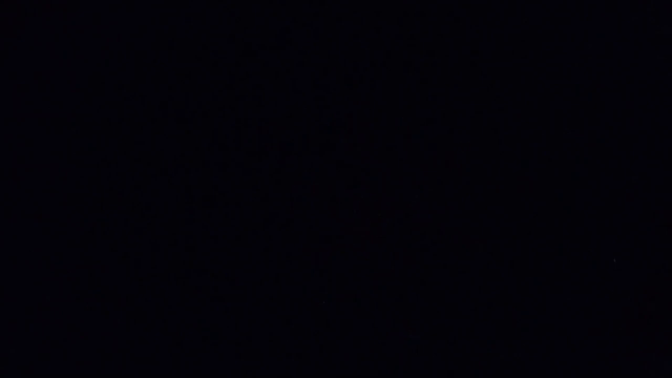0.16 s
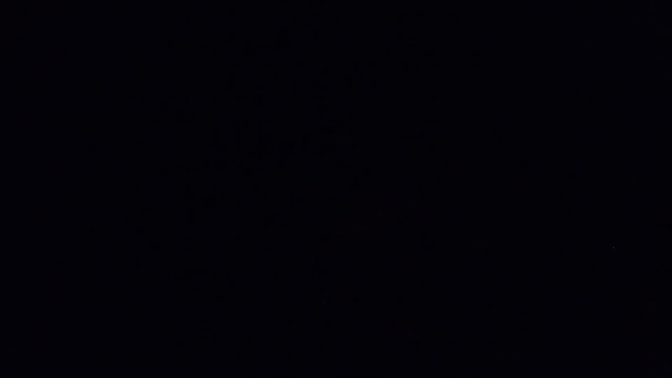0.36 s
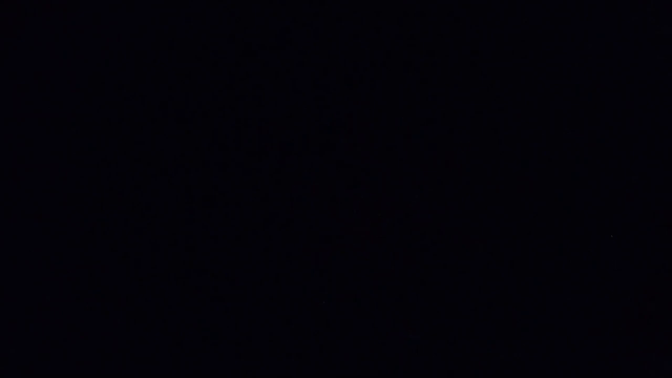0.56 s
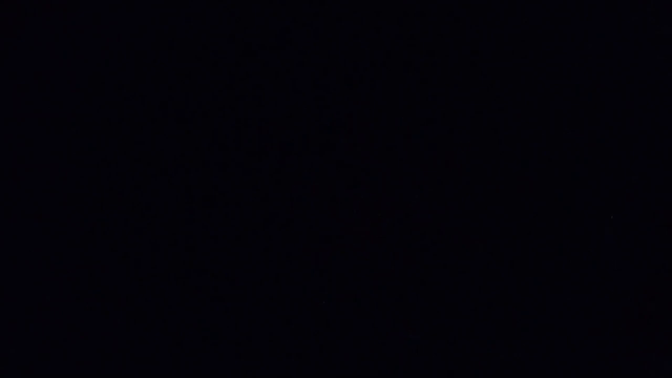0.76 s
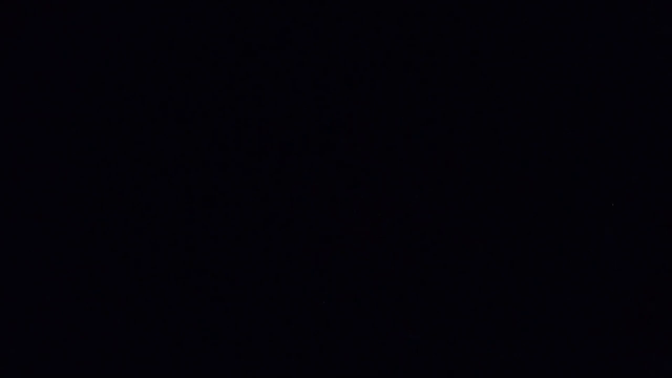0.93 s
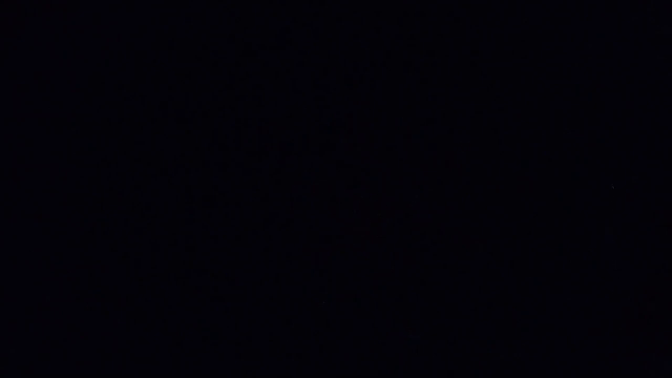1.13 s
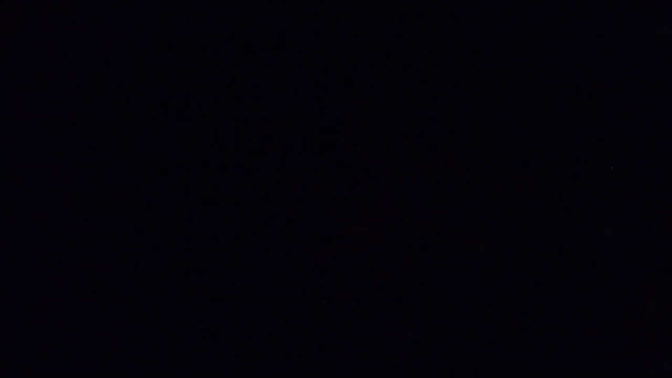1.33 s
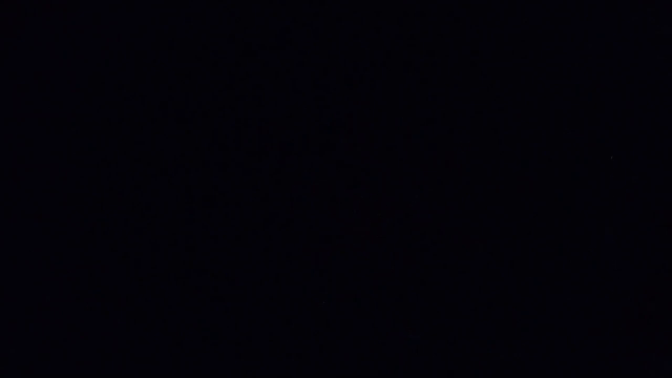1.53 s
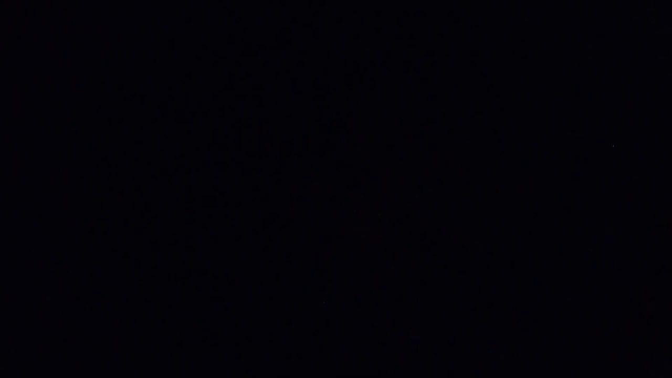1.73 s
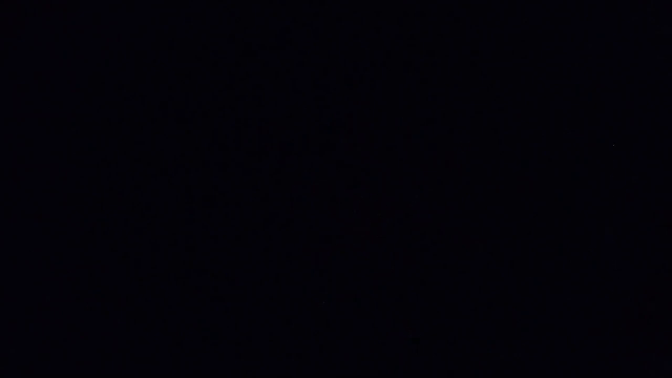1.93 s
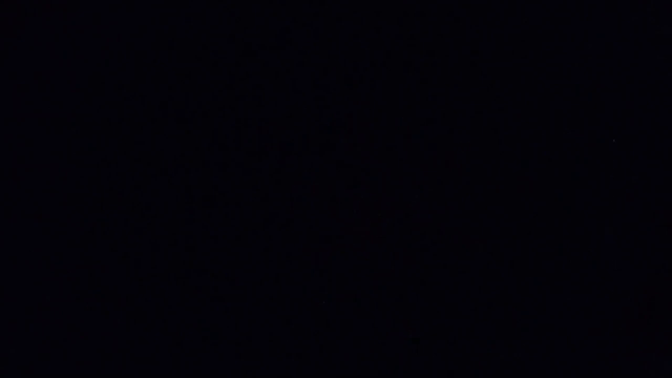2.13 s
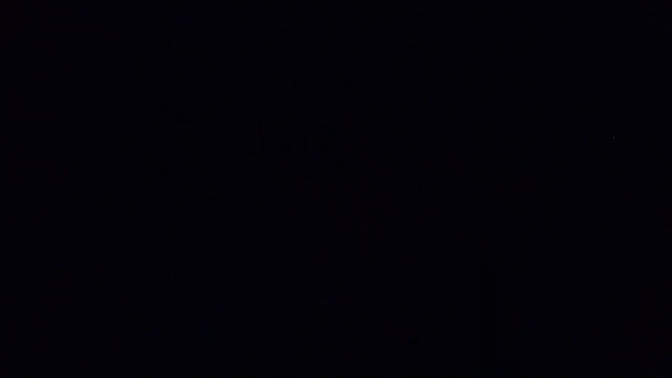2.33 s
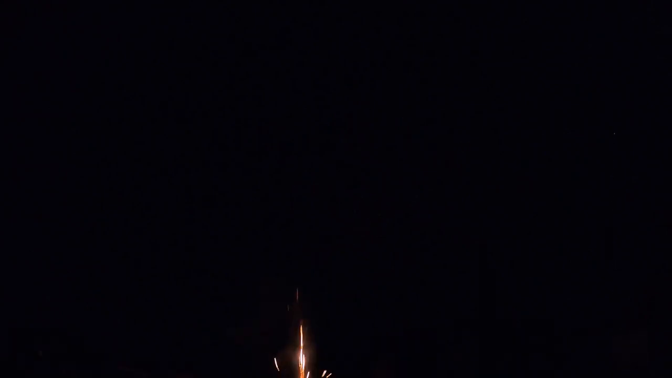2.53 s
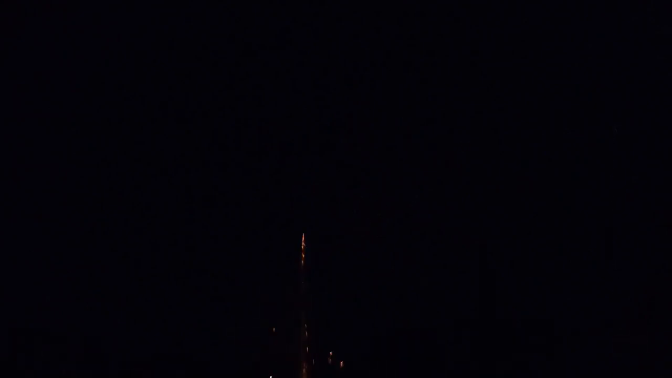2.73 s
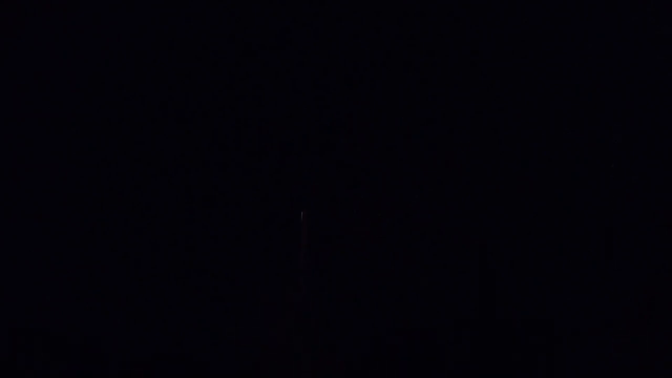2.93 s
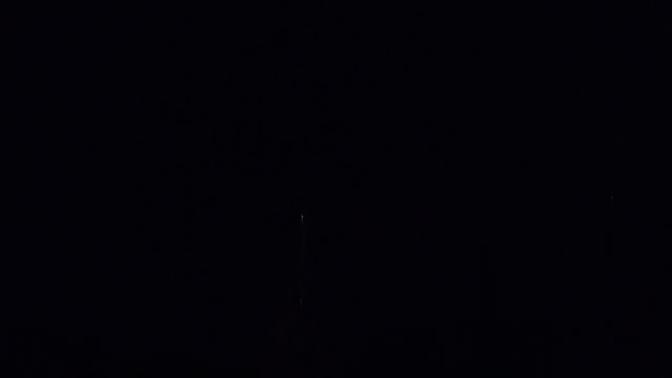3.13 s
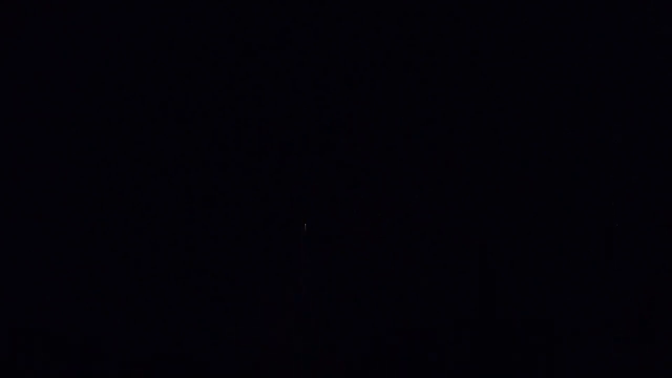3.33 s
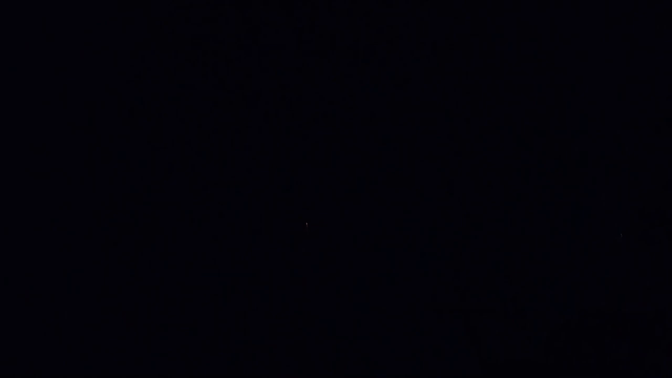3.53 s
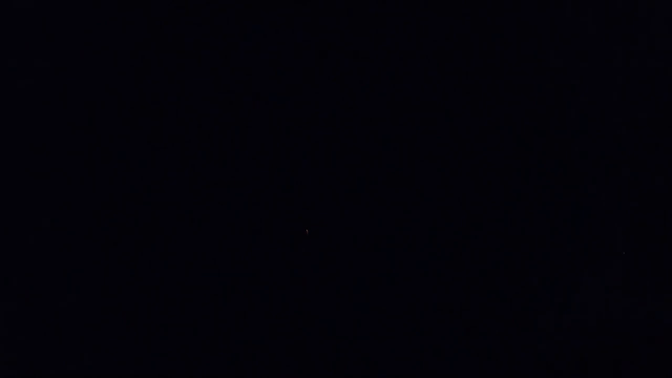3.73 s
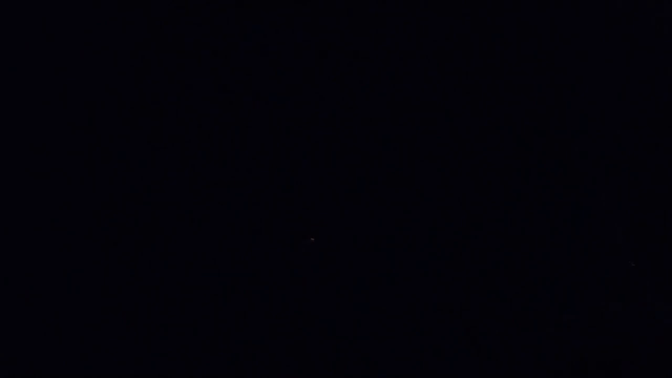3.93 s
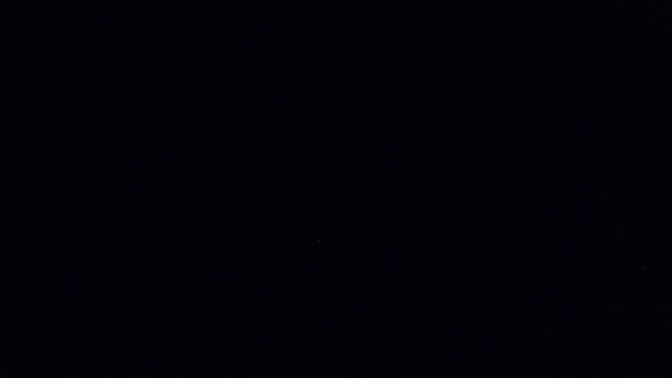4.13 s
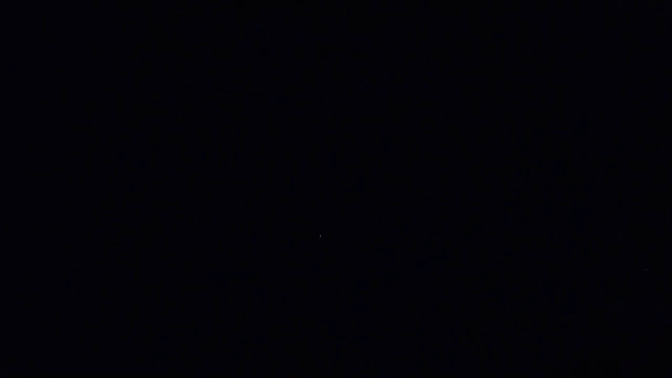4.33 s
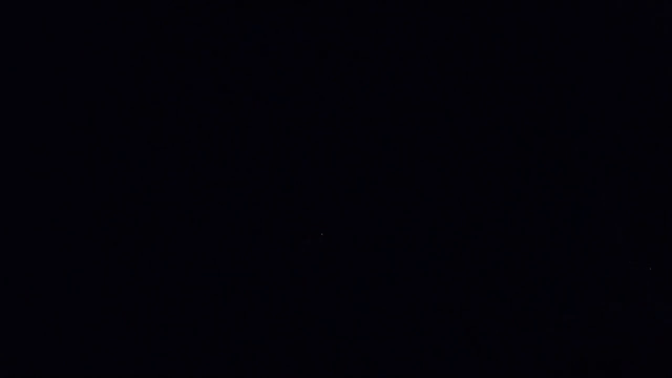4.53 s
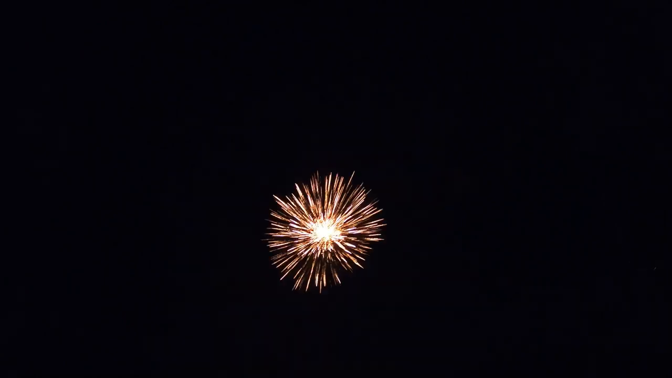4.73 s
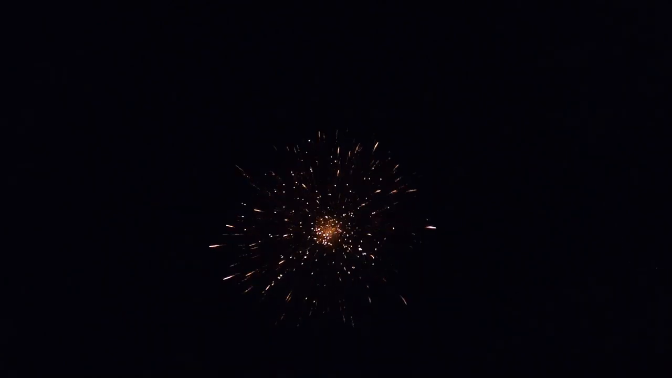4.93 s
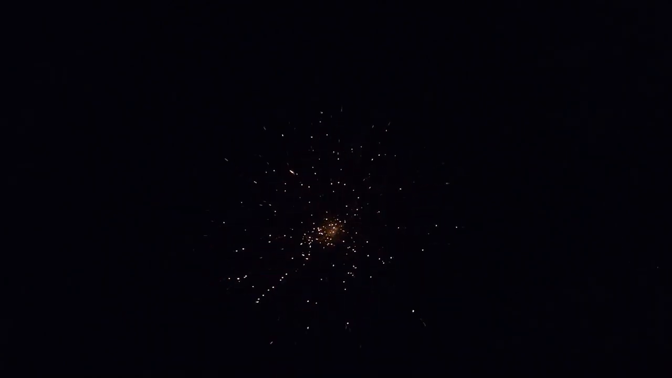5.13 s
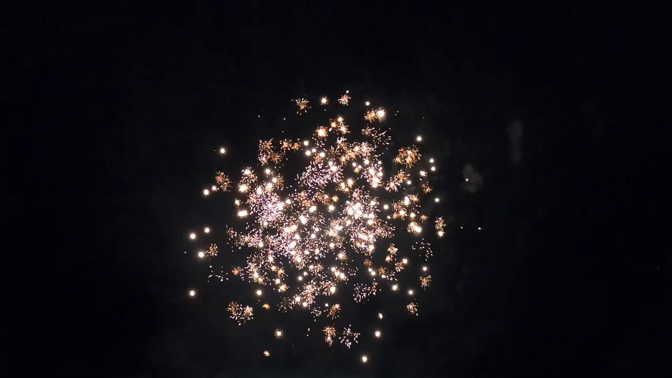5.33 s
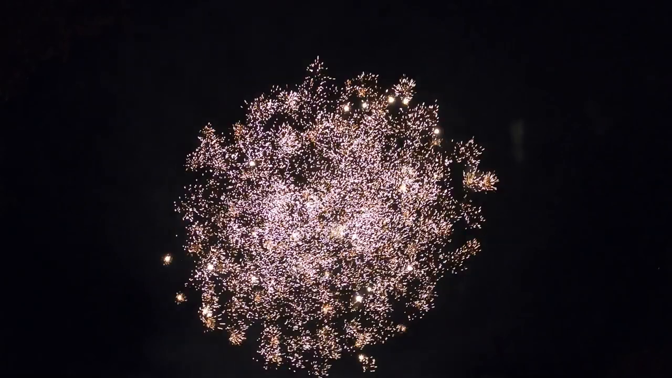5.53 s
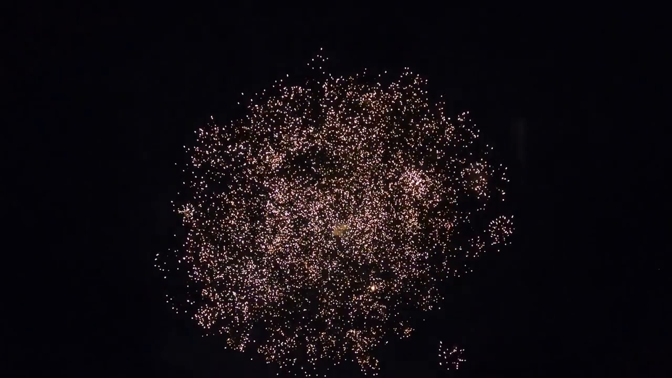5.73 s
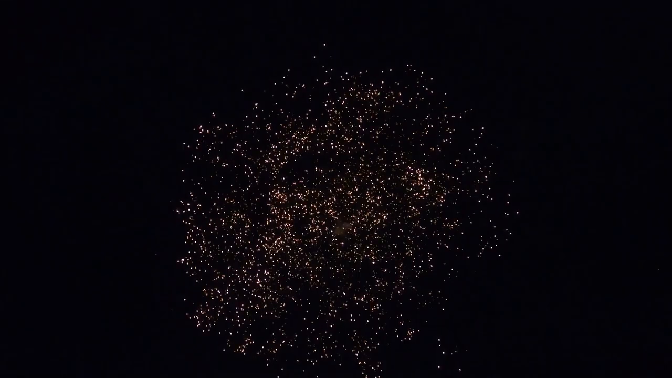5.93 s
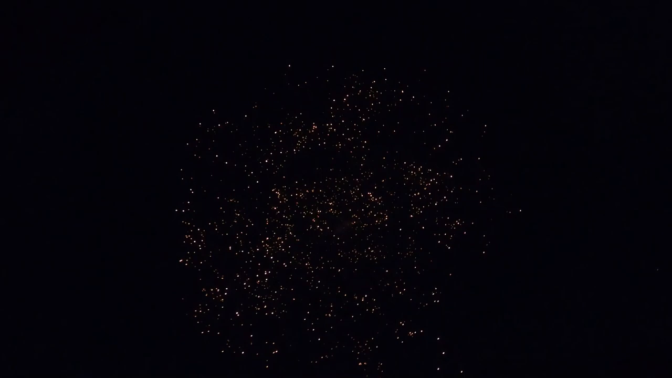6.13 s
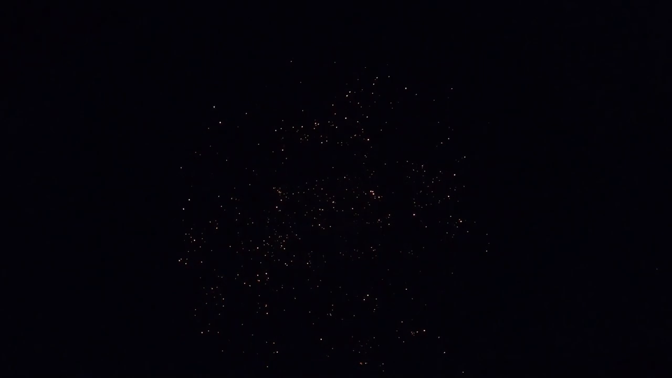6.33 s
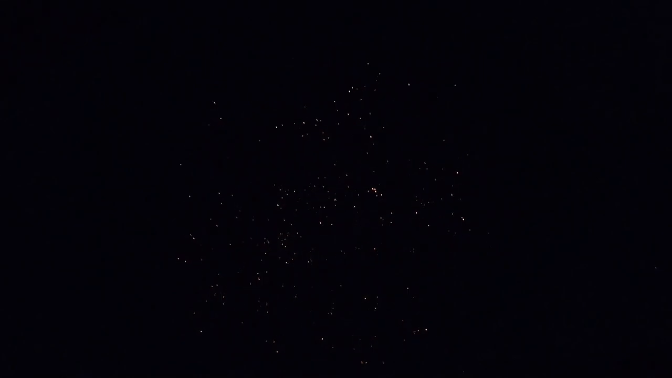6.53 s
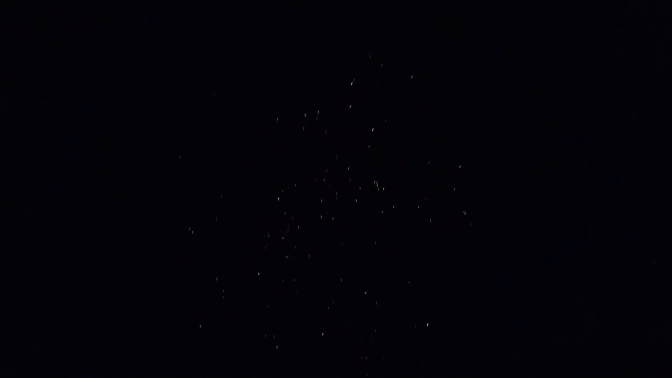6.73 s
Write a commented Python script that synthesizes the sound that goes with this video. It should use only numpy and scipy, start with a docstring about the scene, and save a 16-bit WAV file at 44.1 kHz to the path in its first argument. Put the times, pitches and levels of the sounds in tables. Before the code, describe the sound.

Quiet night air with crickets, one sharp mortar bang and rumble, a second tearing bang, then a swarm of popping stars fading into hiss.

```python
"""A firework in open country at night: a mortar fires, a shell bursts overhead and its stars pop in a swarm.
Each bang is a short pressure front with filtered noise for the gas or the tearing casing.
Shaped stereo noise gives the roll from fields and trees, its treble duller with travel time;
separate fronts give the echoes off tree lines, and dense random pulses give the swarm.
Narrow noise bands are crickets; fading noise is an earlier shell; a few sparks snap near the mortar."""
import sys
import numpy as np
from scipy import signal
from scipy.fft import rfft, irfft, next_fast_len
from scipy.io import wavfile
from scipy.ndimage import map_coordinates

SR = 44100
rng = np.random.default_rng(int(sys.argv[2]) if len(sys.argv) > 2 else 0)


def waveform_to_disk(signal):
    """Save audio, clipped to [-1, 1], as 16-bit WAV at the path in sys.argv[1]."""
    frames = np.transpose(np.atleast_2d(signal))
    scaled = np.clip(frames, -1, 1) * 32767
    samples = np.round(scaled).astype(np.int16)
    wavfile.write(sys.argv[1], SR, samples)


N = 298233

# Pressure fronts of the mortar shot: (time [s], thump level [dB], thump frequency [Hz], crack level [dB])
LIFT_FRONTS = [(2.5755, -9.5, 58.5, -29), (2.5892, -11.5, 400, -8.5), (2.5905, -2, 169, -32)]
# Pressure fronts of the shell burst: (time [s], thump level [dB], thump frequency [Hz], crack level [dB])
BURST_FRONTS = [(4.8942, -12.5, 129, -19), (4.9045, -8.5, 165, -11), (4.9154, -6.5, 340, 1.5),
                (4.9232, -6.5, 192, -18)]
# Distinct tree-line echoes: (time [s], thump level [dB], thump frequency [Hz], crack level [dB])
TREE_LINE_ECHOES = [(2.606, -20.5, 255, -48), (2.654, -14.5, 165, -46), (2.725, -16.5, 142, -37),
                    (2.7865, -14.5, 121, -23), (2.8999, -35, 130, -13.5), (2.955, -24, 126, -52),
                    (3.306, -28, 85, -56), (5.173, -15, 189, -26), (5.39, -19, 330, -37)]
# Stars placed singly: (time [s], pulse level [dB])
SINGLE_STARS = [(5.346, -15.5), (5.4435, -9.5), (5.4617, -9.5), (5.473, -5.5), (5.4845, -5.5), (5.876, -7),
                (5.896, -5.5), (5.9477, -7), (5.9567, -7.5), (5.9723, -8.5), (5.9866, -8.5), (6.0494, -8.5),
                (6.3226, -4.5)]
# Density of the random swarm of stars: (time [s], pop rate [1/s])
SWARM_RATE = [(5.45, 0), (5.5, 150), (5.55, 720), (5.69, 850), (5.83, 230), (5.93, 0)]
# Sparks on the ground: (time [s], reference level [dB], snap level above the reference [dB])
GROUND_SPARKS = [(0.1141, -41, -14), (0.6045, -46, -14), (1.1136, -34.5, 3), (1.124, -38.5, -3)]
# Insect bands: (centre [Hz], half width at half amplitude [Hz], level before dips [dB], flutter rate [1/s])
INSECT_BANDS = [(2534, 140, -58, 14), (2866, 61.5, -56.5, 30), (2948, 167, -56, 40), (6695, 286, -53.5, 87),
                (7060, 54, -67, 25)]
# Loud moments at which the background sinks: (time [s], depth [dB])
BACKGROUND_DIPS = [(2.58, 18), (4.91, 12), (5.68, 17)]
# Stereo spread of noise from all round: (frequency [Hz], side minus mid [dB])
STEREO_WIDTH = [(60, -24), (110, -35.5), (200, -27.5), (380, -14), (700, -9.5), (1290, -8), (2380, -2.5),
                (4400, -2.5), (8120, 2), (15000, -3)]

# The spectra below give the relative level in each hertz of bandwidth.
# Gas jet at the mortar: (frequency [Hz], level [dB])
GAS_SPECTRUM = [(410, -57.5), (700, -35.5), (1250, -4.5), (1630, -12.5), (2280, 0), (3030, -3.5),
                (3680, -5.5), (6180, -8), (6680, -21), (9350, -19), (15500, -62)]
# Tearing shell casing: (frequency [Hz], level [dB])
CASING_SPECTRUM = [(150, -18), (330, 3.5), (550, -6), (1200, -13.5), (2000, -17), (4000, -23),
                   (6500, -37.5), (8100, -34), (9500, -44), (16000, -52)]
# Crack of a direct pressure front: (frequency [Hz], level [dB])
CRACK_SPECTRUM = [(40, -50), (200, 0), (700, 3.5), (1600, 4.5), (3000, -2.5), (5000, -19.5), (8300, -19),
                  (10500, -27.5), (15000, -30.5)]
# Crack of a tree-line echo: (frequency [Hz], level [dB])
FAR_CRACK_SPECTRUM = [(100, -17), (500, -8.5), (1100, 9), (2300, 0.5), (4000, -18.5), (8000, -34),
                      (15000, -65)]
# Pop of one star: (frequency [Hz], level [dB])
STAR_SPECTRUM = [(60, -30), (150, -8), (330, -1), (620, -4), (1600, 0), (3000, 1.2), (5000, -5.5),
                 (7000, -15), (10000, -24), (13000, -37), (17000, -54)]
# Snap and fizz of a spark: (frequency [Hz], level [dB])
SPARK_SPECTRUM = [(300, -32), (900, -16), (1400, 4), (2000, -1.5), (3000, 4.5), (4200, -4.5), (6000, -11.5),
                  (10000, -30), (15000, -46)]
# Low roll of the earlier shell: (frequency [Hz], level [dB])
EARLIER_ROLL_SPECTRUM = [(35, -37.5), (60, -0.5), (70, -9.5), (186, 0), (383, -8.5), (567, -18),
                         (710, -16.5), (946, -24), (1490, -28.5), (2200, -37), (2860, -70), (4840, -120)]
# Ember hiss of the earlier shell: (frequency [Hz], level [dB])
EMBER_SPECTRUM = [(1500, -20), (3500, 0), (5000, 0.5), (8000, -7.5), (11000, -24), (15000, -45)]
# Low roll after the mortar shot: (frequency [Hz], level [dB])
LIFT_ROLL_SPECTRUM = [(15, -40.5), (25, -7), (75, -5.5), (101, -2.5), (134, -1.5), (190, -6.5), (319, -23),
                      (502, -22.5), (550, -37), (720, -54), (1210, -120)]
# Echo hiss after the mortar shot: (frequency [Hz], level [dB])
LIFT_HISS_SPECTRUM = [(240, -25), (400, -11), (580, -6), (750, -5), (1100, -1), (1400, -3.5), (2300, -3.5),
                      (4000, -11), (6200, -18), (9000, -29.5), (12000, -45), (15000, -65)]
# Low roll after the burst: (frequency [Hz], level [dB])
BURST_ROLL_SPECTRUM = [(15, -42), (25, -26), (48, -4), (76, -3.5), (115, 1), (338, -1.5), (443, -4.5),
                       (496, -7), (548, -13), (750, -10.5), (980, -42), (1650, -120)]
# Echo hiss after the burst: (frequency [Hz], level [dB])
BURST_HISS_SPECTRUM = [(290, -49), (500, -1), (545, -12.5), (1080, -2), (1390, -8), (1630, -6), (1800, -8),
                       (4540, -14.5), (8610, -28), (15000, -56)]
# Low roll under the swarm: (frequency [Hz], level [dB])
SWARM_ROLL_SPECTRUM = [(25, -40), (70, -14), (120, 0.5), (250, 0), (400, -8.5), (600, -17), (1200, -70)]
# Echo hiss of the swarm: (frequency [Hz], level [dB])
SWARM_HISS_SPECTRUM = [(290, -19), (500, -8), (593, -3), (883, -1.5), (1110, 1), (2020, -2.5), (2640, -1.5),
                       (3670, -3), (5620, -9), (9650, -26), (13600, -47), (15000, -60)]
# Outdoor night air: (frequency [Hz], level [dB])
NIGHT_SPECTRUM = [(20, -20), (45, 3), (70, -6.5), (110, -7), (160, -13.5), (400, -22.5), (550, -27),
                  (700, -34), (1200, -30), (2000, -41.5), (4000, -52), (6000, -50), (9000, -63.5),
                  (13000, -82)]


def amp(db):
    """Decibel law: twenty decibels are a factor of ten in pressure."""
    return 10 ** (np.asarray(db) / 20)


def unit(x):
    """Normalisation: root mean square pressure becomes 1."""
    return x / np.sqrt(np.mean(x ** 2) + 1e-20)


def clock():
    """Sampling: the time of every sample in seconds."""
    return np.arange(N) / SR


def along(points, hz):
    """Logarithmic frequency scale: (frequency, value) points are interpolated on it."""
    frequency, value = np.transpose(points)
    return np.interp(np.log(hz + 1), np.log(frequency + 1), value)


def wobble(rate):
    """Random modulation: a smooth curve through normal random knots, rate knots a second."""
    knots = rng.standard_normal(int(N * rate / SR) + 4)
    return map_coordinates(knots, [clock() * rate])


def filtered(x, response):
    """Linear filtering: the spectrum is multiplied by a response of frequency."""
    size = next_fast_len(N + SR // 2)
    hz = np.fft.rfftfreq(size, 1 / SR)
    return irfft(rfft(x, size) * response(hz), size)[..., :N]


def diffuse(spectrum, grain_db=0):
    """Diffuse field: stereo noise with mid rms 1, roughened by grain into many small reflections."""
    pair = rng.standard_normal((2, N)) * amp(grain_db * wobble(900))

    def mid_side_colour(hz):
        return amp(along(spectrum, hz) + np.outer([0, 1], along(STEREO_WIDTH, hz)))

    mid, side = filtered(pair, mid_side_colour)
    return np.array([mid + side, mid - side]) / np.std(mid)


def ahead(x, lag_ms, pan_db):
    """Interaural-type cues: the left port hears a sound from in front later and, for pan_db > 0, louder.

    lag_ms is the bass lag, fading in the treble; pan_db is the level difference at 2 kHz.
    """
    port = np.array([[.5], [-.5]])

    def response(hz):
        phase = 2 * np.pi * hz * lag_ms / 1000 / (1 + (hz / 5000) ** 2)
        # the recorder's body shades one port more as frequency rises, up to 8 kHz
        shade_db = pan_db * (.5 + np.minimum(hz / 4000, 2))
        return amp(port * shade_db) * np.exp(-1j * port * phase)

    return filtered(x, response)


def dipped():
    """Gain modulation: the background sinks over 20 ms up to each loud moment and recovers steadily."""
    t = clock()
    recover_db_per_s = 10.5
    dips = []
    for s, depth_db in BACKGROUND_DIPS:
        drop = depth_db * np.clip(1 + 50 * (t - s), 0, 1)
        dips.append(drop - recover_db_per_s * np.maximum(t - s, 0))
    return amp(-np.maximum(np.max(dips, axis=0), 0))


def night():
    """Superposition: low outdoor air, a faint far tone, and an earlier shell's decaying roll and hiss."""
    t = clock()
    tone = np.sin(2 * np.pi * 777 * t + 0.76 * wobble(8))  # Hz; the phase wanders
    hum = amp(-68.0 + 1.2 * wobble(2.9)) * tone
    air = amp(-47.0) * diffuse(NIGHT_SPECTRUM)
    # the earlier shell: level at the start [dB] and fall [dB/s], before the dips
    roll_gain = amp(-36 - 7 * t + 1.8 * wobble(10.88))
    roll = roll_gain * diffuse(EARLIER_ROLL_SPECTRUM, grain_db=1.5)
    hiss_gain = amp(-69 - 4.5 * t + 1.4 * wobble(7.6))
    hiss = hiss_gain * diffuse(EMBER_SPECTRUM, grain_db=1.5)
    return ahead((air + hum + roll + hiss) * dipped(), lag_ms=.03, pan_db=1.1)


def crickets():
    """Incoherent summation: many insects of a kind merge into a narrow, fluttering noise band."""
    out = np.zeros((2, N))
    for centre, half_width, db, flutter in INSECT_BANDS:
        noise = rng.standard_normal((2, N))
        band = filtered(noise, lambda hz: 1 / (1 + np.abs((hz - centre) / half_width) ** 3))
        fluttering = band * amp(1.0 * wobble(2 * flutter))
        out += amp(db) * unit(fluttering)
    return ahead(out * dipped(), lag_ms=0, pan_db=1.7)


def swell(s, rise, fall):
    """Exponential growth and decay: a peak at s; rise and fall are the seconds for 20 dB."""
    t = clock() - s
    return amp(-20 * np.maximum(-t / rise, t / fall))


def sparks():
    """Impulsive release: each spark near the mortar is a rough noise tick with a fizzing tail."""
    fizz = np.zeros(N)
    for s, level_db, snap_db in GROUND_SPARKS:
        fizz += amp(level_db + snap_db - 6) * swell(s, rise=0.0009, fall=0.0062)
        fizz += amp(level_db - 13.5) * swell(s, rise=.002, fall=0.17)
    return fizz * amp(.7 * wobble(100)) * diffuse(SPARK_SPECTRUM, grain_db=2.5)


def clicks(times, db, spectrum, size=2048):
    """Minimum phase: causal pulses of a given colour start as sharply as that colour allows."""
    hz = np.fft.rfftfreq(size, 1 / SR)
    cepstrum = irfft(np.log(amp(along(spectrum, hz))))
    # folding the cepstrum onto positive time makes the pulse causal
    fold = np.r_[1, np.full(size // 2 - 1, 2), np.zeros(size // 2)]
    pulse = irfft(np.exp(rfft(cepstrum * fold)))
    train = np.bincount(np.round(np.asarray(times) * SR).astype(int), amp(db), N)[:N]
    return signal.fftconvolve(train, pulse / np.abs(pulse).max())[:N]


def n_wave(x):
    """Shock propagation: a phase turn of up to 51 degrees makes a far shock swing below rest as well."""
    return filtered(x, lambda hz: np.exp(1j * np.pi / 3.5 * hz / (hz + 300)))


def blasts(rows, colour, cycles):
    """Blast wave: a crack, with a low swing of air that dies within a cycle or two."""
    thumps = np.zeros(N)
    t = np.arange(SR // 5) / SR
    for s, db, hz, _ in rows:
        swing = np.sin(2 * np.pi * hz * t) * np.exp(-(hz * t / cycles) ** 2)
        thumps[round(s * SR):][:len(t)] += amp(db) * swing
    s, _, _, crack_db = np.transpose(rows)
    return thumps + n_wave(clicks(s, crack_db, colour))


def rolling(start_s, db, climb_db, climb_s, hold_s, fall_db_per_s, late_db, late_db_per_s):
    """Reverberant build-up and decay: the echo climbs as more land replies, holds, then falls.

    The far hills start late_db relative to the near land and fade at their own rate.
    """
    t = clock() - start_s
    climb = -climb_db * np.clip(1 - t / climb_s, 0, 1)
    age = np.maximum(t - climb_s - hold_s, 0)
    near = amp(-fall_db_per_s * age)
    far = amp(late_db - late_db_per_s * age)
    onset = np.clip(100 * t, 0, 1)
    return onset * amp(db + climb) * np.hypot(near, far)


def dulled(x, since, loss_db):
    """Air absorption: loss_db per kHz above 1.5 kHz and per second of travel after since.

    Up to 0.15 s before since the treble is brighter; the loss stops growing 1.2 s after it.
    """
    hz, t, z = signal.stft(x, SR, nperseg=512)
    travel = np.clip(t - since, -.15, 1.2)
    above_khz = np.maximum(hz / 1000 - 1.5, 0)
    absorbed = z * amp(-loss_db * above_khz[:, None] * travel)
    return signal.istft(absorbed, SR, nperseg=512)[1][:, :N]


def lift():
    """Sudden gas expansion: the mortar thumps and spits a jet; the land answers with roll and hiss."""
    jet = amp(-10.5) * swell(2.585, rise=0.013, fall=0.0084) * diffuse(GAS_SPECTRUM)[0]
    fronts = blasts(LIFT_FRONTS, CRACK_SPECTRUM, cycles=1.18)
    shot = ahead(fronts + jet, lag_ms=0.068, pan_db=-0.9)
    low = rolling(2.595, db=-28, climb_db=2.5, climb_s=0.15, hold_s=0.037,
                  fall_db_per_s=36.5, late_db=-29, late_db_per_s=1.5)
    high = rolling(2.582, db=-29.5, climb_db=10.5, climb_s=.17, hold_s=0.037,
                   fall_db_per_s=40.5, late_db=-11, late_db_per_s=13)
    roll = low * amp(1.4 * wobble(16)) * diffuse(LIFT_ROLL_SPECTRUM)
    hiss = dulled(diffuse(LIFT_HISS_SPECTRUM, grain_db=1.5), since=2.775, loss_db=5.0)
    echo = high * amp(0.4 * wobble(45)) * hiss
    return shot + ahead(roll + echo, lag_ms=.025, pan_db=0.9)


def tree_lines():
    """Specular reflection: tree lines return separate, softer copies of the bangs."""
    return ahead(blasts(TREE_LINE_ECHOES, FAR_CRACK_SPECTRUM, cycles=1.6), lag_ms=0.037, pan_db=0.0)


def burst():
    """Rupture under pressure: the casing tears open high up and the countryside returns the bang."""
    tear = amp(-12) * swell(4.914, rise=0.022, fall=0.015) * diffuse(CASING_SPECTRUM)[0]
    fronts = blasts(BURST_FRONTS, CRACK_SPECTRUM, cycles=1.3)
    bang = ahead(fronts + tear, lag_ms=.12, pan_db=-1.4)
    # the late part of the low roll grows very slightly
    low = rolling(4.923, db=-28, climb_db=11.5, climb_s=0.13, hold_s=0.3,
                  fall_db_per_s=38, late_db=-13.5, late_db_per_s=-0.6)
    high = rolling(4.925, db=-30.0, climb_db=13, climb_s=0.22, hold_s=0.036,
                   fall_db_per_s=27, late_db=-11, late_db_per_s=8.5)
    roll = low * amp(1.7 * wobble(18)) * diffuse(BURST_ROLL_SPECTRUM, grain_db=2)
    echo = high * dulled(diffuse(BURST_HISS_SPECTRUM, grain_db=0.5), since=5.034, loss_db=4.5)
    return bang + ahead(roll + echo, lag_ms=.025, pan_db=0.5)


def stars():
    """Random point process: times and levels of the swarm's pops, joined by the single stars."""
    level_db, scatter_db = -11, 1.9
    t = clock()
    rate = np.interp(t, *np.transpose(SWARM_RATE)).clip(0) * (t < SWARM_RATE[-1][0])
    due = np.cumsum(rate) / SR  # pops expected so far
    chance = rng.standard_normal((int(due[-1]), 2))
    turns = np.clip(np.arange(len(chance)) + chance[:, 0], 1, len(chance) - 1)
    swarm_times = np.searchsorted(due, turns) / SR
    swarm_db = level_db + scatter_db * chance[:, 1]
    single_times, single_db = np.transpose(SINGLE_STARS)
    return np.r_[swarm_times, single_times], np.r_[swarm_db, single_db]


def reply(times, db):
    """Energy summation: gain, top 1, of the land's answer as pop echoes pile up and drain away."""
    t = np.arange(2 * SR) / SR
    near_fields = amp(-108 * t) ** 2  # die fast
    far_woods = amp(-12.5 - 13.5 * t) ** 2  # weaker, and linger
    pops = np.bincount(np.round(times * SR).astype(int), amp(db) ** 2, N)
    energy = np.abs(signal.fftconvolve(pops, near_fields + far_woods)[:N])
    return np.sqrt(energy / energy.max())


def crackle():
    """Image source and reverberation: the ground repeats each star's pop; echoes merge into hiss and roll."""
    times, db = stars()
    pops = n_wave(clicks(times, db, STAR_SPECTRUM))
    bounce_s = .0064

    def bounce(hz):
        # a delay, and a loss of treble above 4 kHz
        return np.exp(-2j * np.pi * hz * bounce_s) / (1 + 1j * hz / 4000)

    ground = amp(-10.5) * filtered(pops, bounce)
    answer = reply(times, db)
    grainy_hiss = dulled(diffuse(SWARM_HISS_SPECTRUM, grain_db=2.5), since=5.84, loss_db=3.0)
    hiss = amp(-24.5) * answer * grainy_hiss
    # the cube makes the rumble shorter than the hiss
    rumble = amp(-29.5) * answer ** 3 * diffuse(SWARM_ROLL_SPECTRUM, grain_db=2.5)
    direct = ahead(pops + ground, lag_ms=0.073, pan_db=-1.0)
    return direct + ahead(hiss + rumble, lag_ms=.025, pan_db=1.5)


def scene():
    """Linear superposition: all sources add at the two ports."""
    return night() + crickets() + sparks() + lift() + tree_lines() + burst() + crackle()


def record(dry):
    """Band limiting and saturation: the recorder drops the deepest bass, rounds peaks and cuts the top."""
    heard = filtered(dry, lambda hz: 1j * hz / (22 + 1j * hz))
    rounded = heard / (1 + np.abs(heard) ** 8) ** (1 / 8)
    return filtered(rounded, lambda hz: hz < 15900)


dry = scene()
out = record(dry)
waveform_to_disk(out)
```